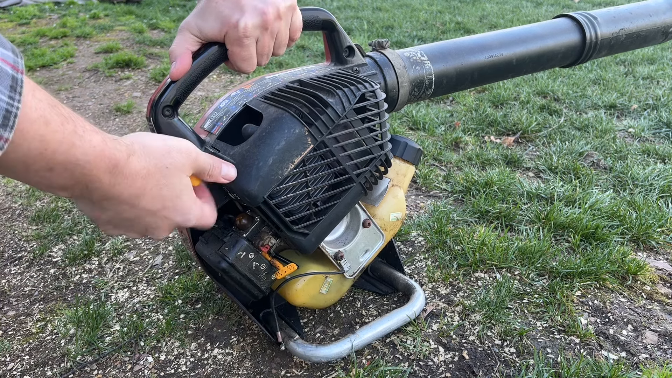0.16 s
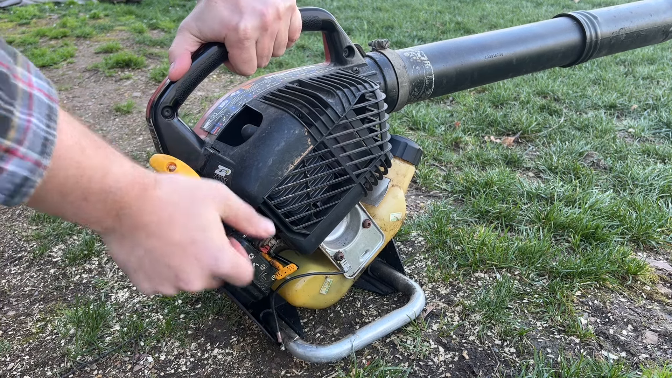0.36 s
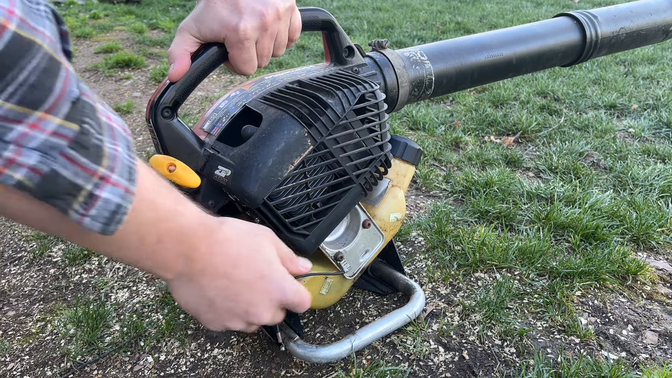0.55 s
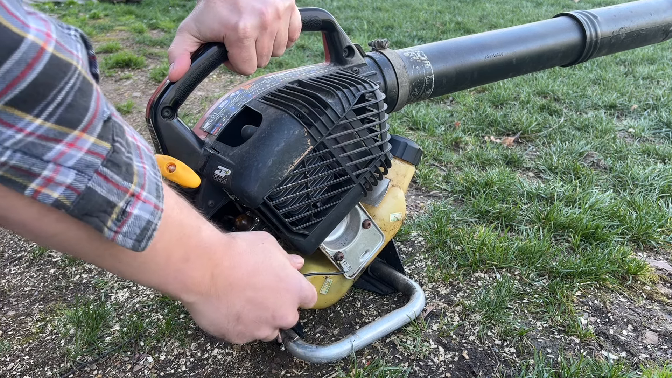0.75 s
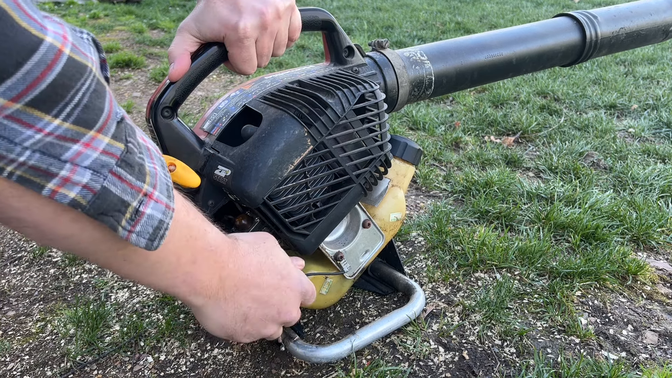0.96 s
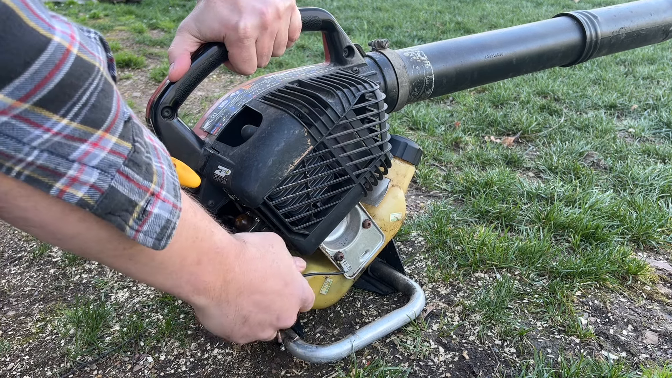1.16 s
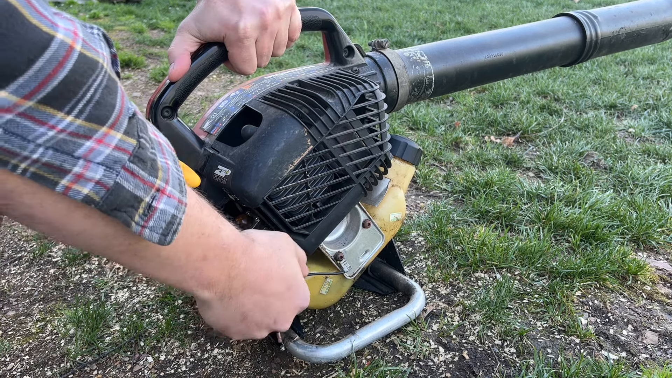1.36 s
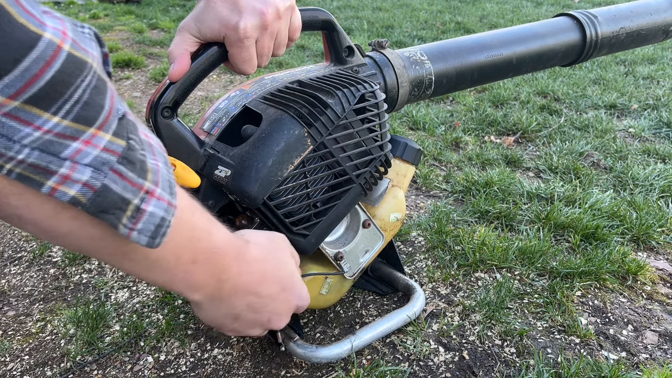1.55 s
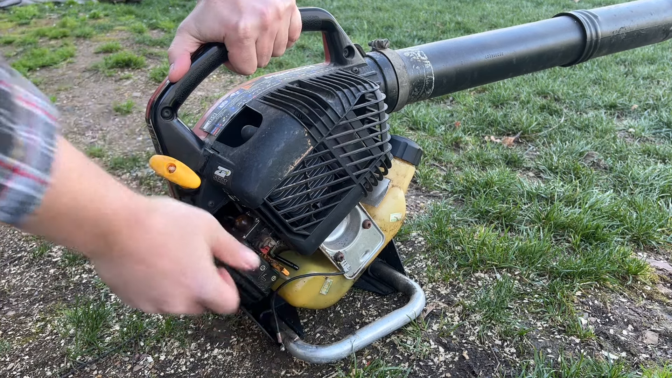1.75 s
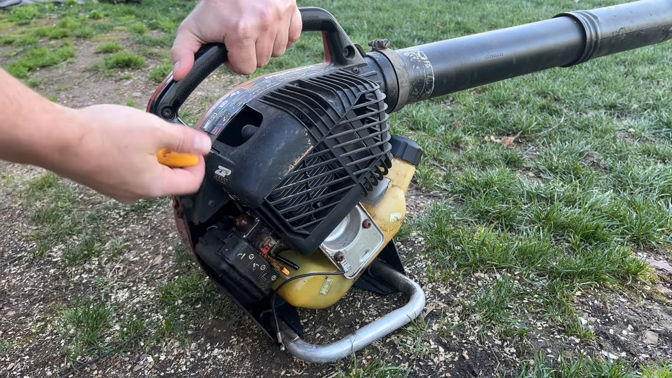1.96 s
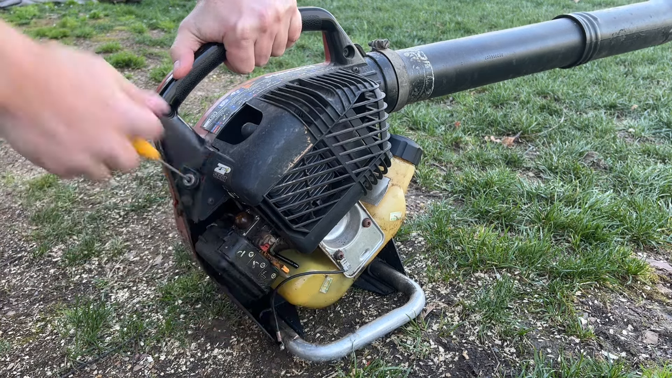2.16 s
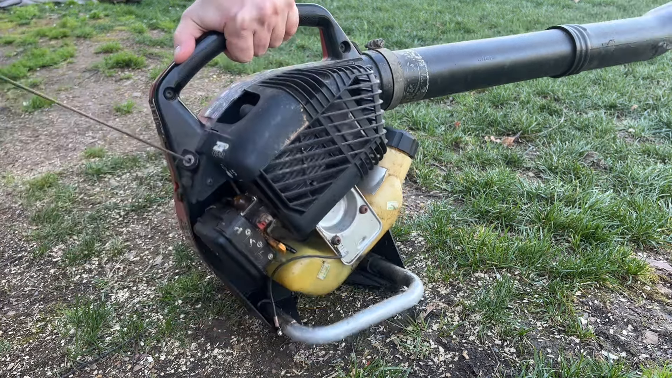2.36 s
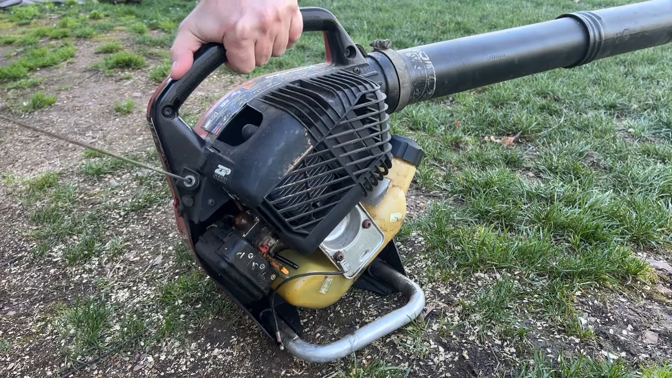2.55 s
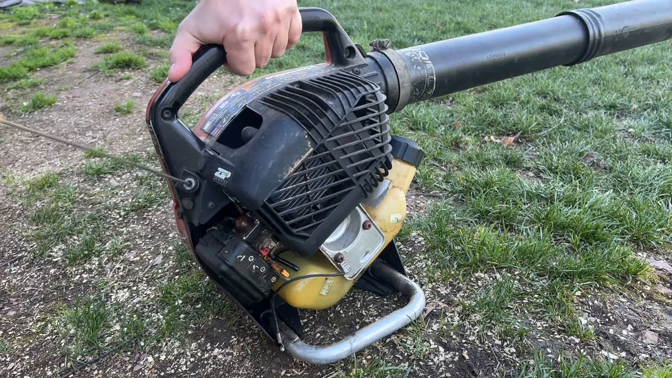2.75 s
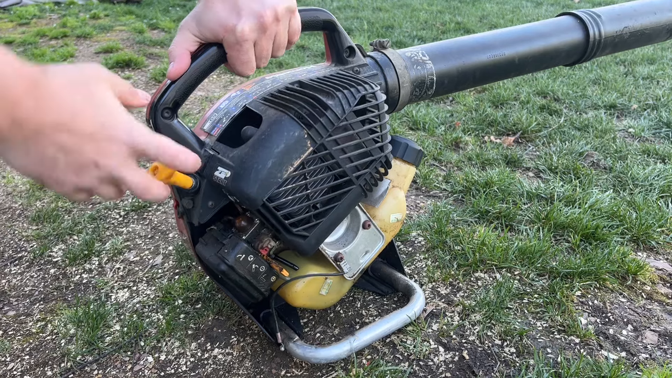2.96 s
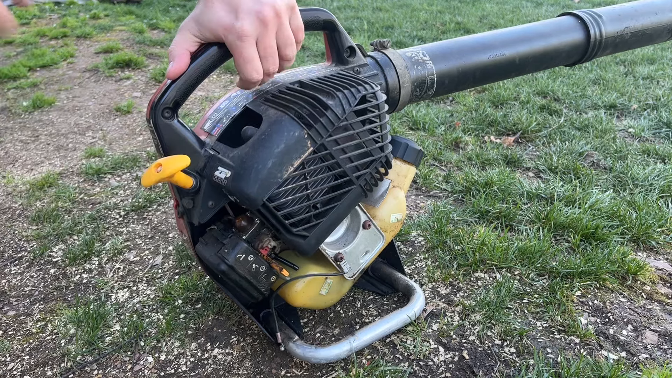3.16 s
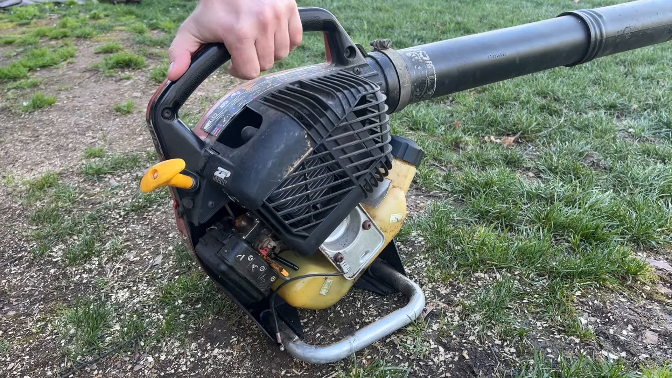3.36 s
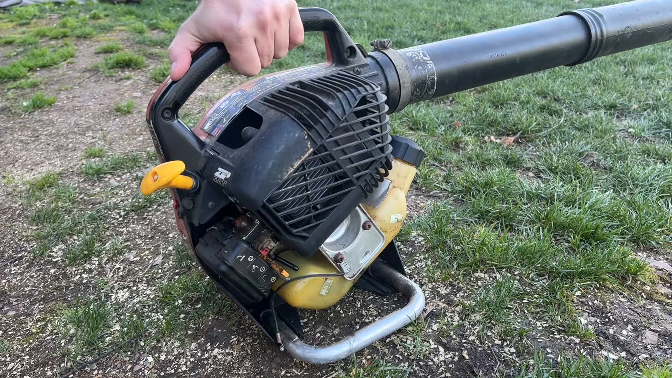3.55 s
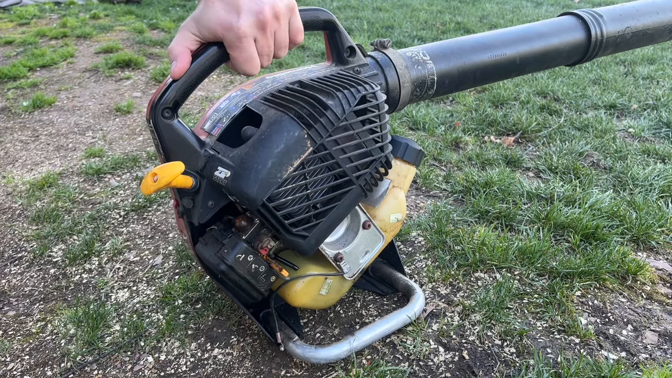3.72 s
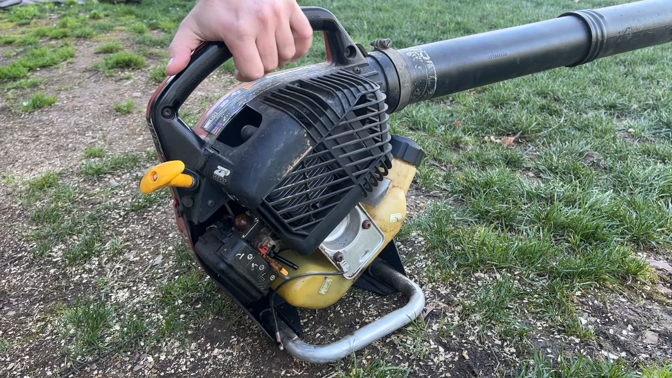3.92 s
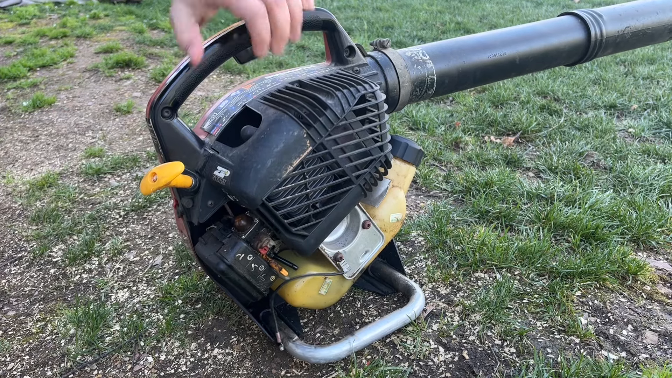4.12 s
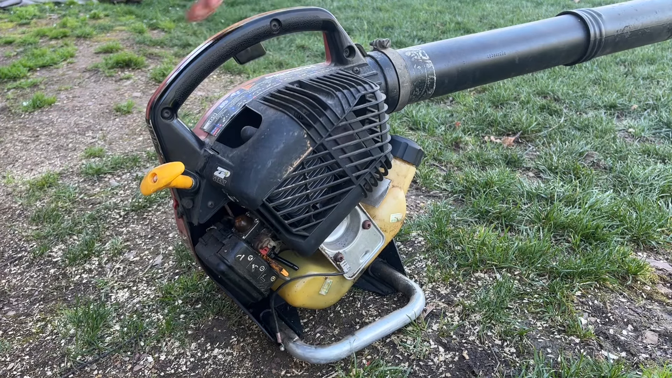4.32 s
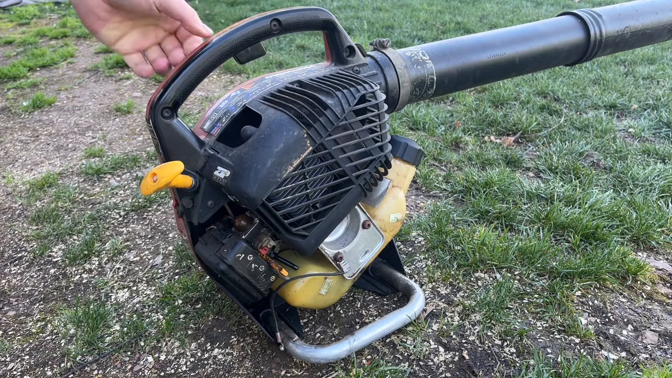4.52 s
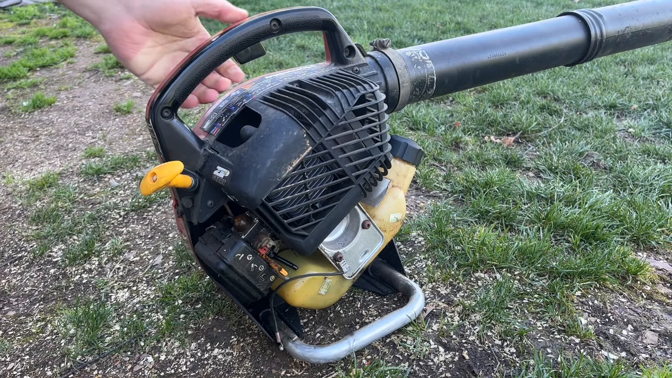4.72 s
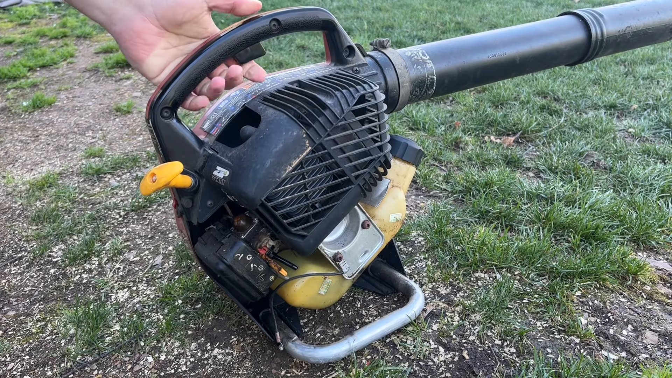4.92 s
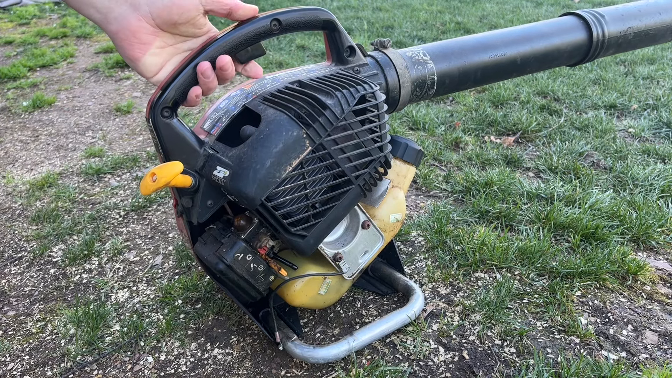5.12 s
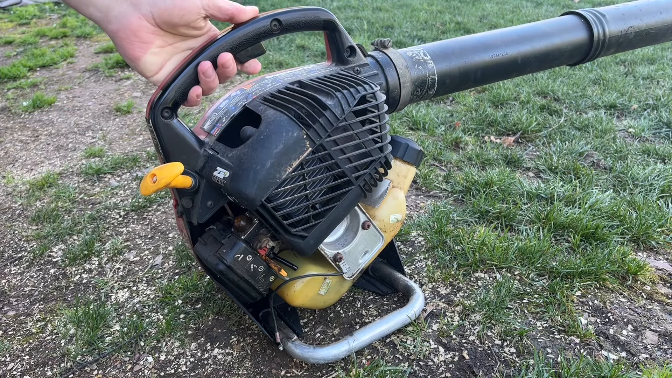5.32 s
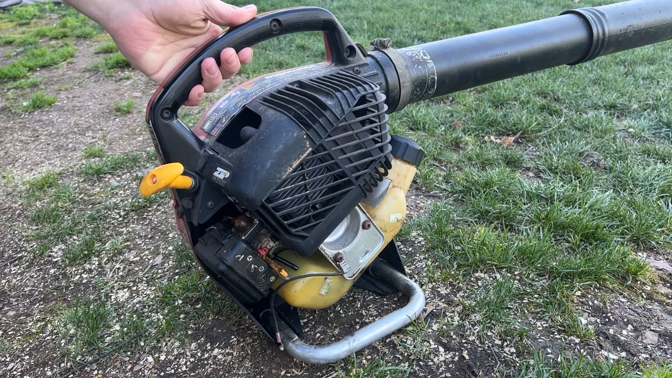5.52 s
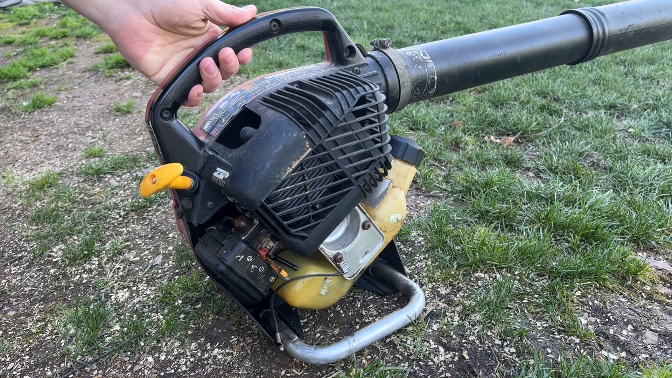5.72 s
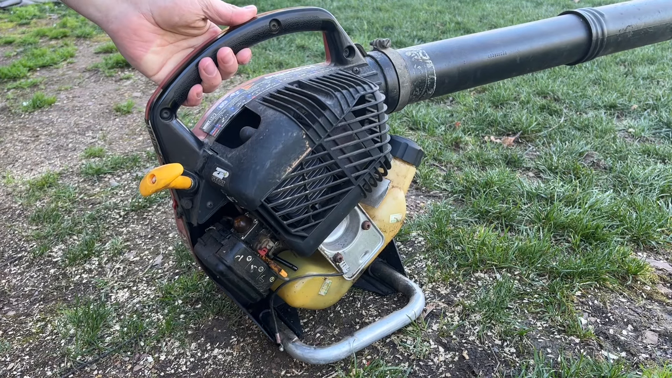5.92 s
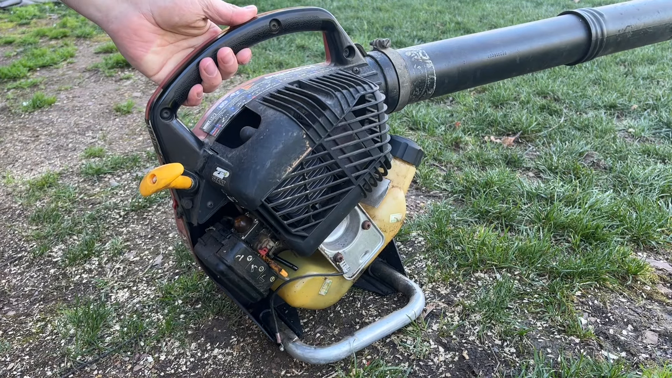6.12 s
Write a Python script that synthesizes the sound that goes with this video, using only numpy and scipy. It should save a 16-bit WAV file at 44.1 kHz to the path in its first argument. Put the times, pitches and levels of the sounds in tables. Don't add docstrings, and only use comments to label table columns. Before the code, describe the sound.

After two seconds of light wind and plastic ticks, a small two-stroke blower engine sputters awake, rattling, buzzing up, coasting down popping, revving again.

```python
import sys
import numpy as np
from scipy import signal
from scipy.fft import rfft, irfft, next_fast_len
from scipy.io import wavfile
from scipy.ndimage import map_coordinates

SR = 44100
rng = np.random.default_rng(int(sys.argv[2]) if len(sys.argv) > 2 else 0)


def master_out(mix):
    frames = np.transpose(np.atleast_2d(mix))
    ceiling = np.clip(frames, -1, 1)
    pcm = np.round(ceiling * 32767).astype(np.int16)
    wavfile.write(sys.argv[1], SR, pcm)


def boost(x):
    u = np.asarray(x, float) / 20
    return 10 ** u


N = 272538
TIME = np.arange(N) / SR
CORD_S, SPIN_UP_S = 2.124, 2.21


def unit(x):
    return x / np.sqrt(np.mean(x ** 2) + 1e-20)


def along(points, hz):
    f, v = np.transpose(points)
    return np.interp(np.log(hz + 1), np.log(f + 1), v)


def curves(rows):
    s, *cols = np.transpose(rows)
    return [np.interp(TIME, s, c) for c in cols]


def wobble(rate):
    knots = rng.standard_normal(int(N * rate / SR) + 4)
    return map_coordinates(knots, [np.arange(N) * rate / SR])


def ramp(s, length):
    return np.clip((TIME - s) / max(length, .001), 0, 1)


def filtered(x, response):
    m = next_fast_len(N + SR // 2)
    return irfft(rfft(x, m) * response(np.fft.rfftfreq(m, 1 / SR)), m)[..., :N]


def resonant(modes, order=1):
    def response(f):
        total = 0
        for k, (centre, width, db) in enumerate(modes):
            mode = 1j * f * width / (centre * centre - f * f + 1j * f * width)
            total = total + (-1) ** k * boost(db) * mode ** order
        return total
    return response


def noise(spectrum):
    return unit(filtered(rng.standard_normal(N), lambda hz: boost(along(spectrum, hz))))


def bursts(times, dbs, rise, t60):
    marks, t = np.zeros(N), np.arange(SR // 5) / SR
    marks[np.round(np.asarray(times) * SR).astype(int)] = boost(dbs)
    shape = (1 - np.exp(-t / rise)) * boost(-60 * t / t60)
    return np.abs(signal.fftconvolve(marks, shape)[:N])


def place(out, s, sound):
    out[round(s * SR):][:len(sound)] += sound


# t/s, level/dB
GUSTS = [(0.0, -58), (0.09, -53), (0.45, -58), (0.47, -49), (0.72, -57), (0.74, -51), (1.48, -55.5),
         (1.64, -41), (2.1, -49.5)]
# f/Hz, level/dB per Hz
RUMBLE = [(47, -26), (80, -0.5), (129, -7.5), (194, -11.5), (313, -24), (350, -33), (600, -42), (780, -80),
          (1320, -120)]
BUFFET = [(15, -30), (35, -3), (65, 10.5), (100, 3.5), (200, -55)]
RUSTLE = [(180, -30), (300, -2.5), (353, -9), (1230, -20.5), (1760, -26), (1970, -33), (5180, -40),
          (8600, -42), (12500, -42), (15000, -49)]
CLOTH = [(500, -30), (1400, 0), (1780, -2), (2400, -9), (3400, -7), (5500, -14.5), (9000, -17),
         (13000, -20), (15000, -40)]
# t/s, length/s, level/dB
SLEEVE = [
    (0.137, 0.2, -74),
    (0.563, .2, -68.5),
    (1.856, 0.19, -66.5),
]


def outdoors():
    gust_db = curves(GUSTS)[0] - np.mean(np.transpose(GUSTS)[1])
    rumble = boost(-47.5 + 0.13 * gust_db + 3.5 * wobble(4.6)) * noise(RUMBLE)
    buffet = boost(-48 + 1.08 * gust_db + 4.5 * wobble(15)) * noise(BUFFET)
    rustle = boost(-63.5 + 0.33 * wobble(31.1)) * noise(RUSTLE)
    arm = sum(boost(db) * np.exp(-((TIME - s) / length) ** 2) for s, length, db in SLEEVE)
    return rumble + buffet + rustle + arm * boost(2.9 * wobble(39.4)) * noise(CLOTH)


# t/s, peak level/dB, knock level/dB, t60/s
TICKS = [
    (0.0475, -58.5, 30, 0.043),
    (0.197, -58, -8, 0.22),
    (0.3016, -67, 35, 0.033),
    (1.3987, -59.5, 25, 0.04),
    (1.4616, -35, 1, 0.047),
    (1.8826, -56, 18, 0.047),
]
# f/Hz, width/Hz, level/dB
SHELL = [(454, 38, 9), (920, 51, -1.5), (1310, 100, -6), (1750, 270, -18)]
# f/Hz, level/dB, t60/s
LATCH = [(834, -3, 0.23), (1210, 23.5, 0.017), (2700, -12, 0.09), (3020, -2, 0.15), (3700, -4, 0.09),
         (5200, -11, 0.11), (6400, -9, .09), (10100, 25.5, 0.014)]


def ticks():
    out, blows, t = np.zeros(N + SR), np.zeros(N), np.arange(SR // 4) / SR
    for s, db, knock_db, t60 in TICKS:
        place(out, s, boost(db - 60 * t / max(t60, .005)) * rng.standard_normal(len(t)))
        blows[round(s * SR)] = boost(db + knock_db + 25)
    lever_s, lever_db = TICKS[4][:2]
    for hz, level, t60 in LATCH:
        place(out, lever_s, boost(lever_db + level - 18 - 60 * t / min(t60, .3)) * np.sin(2 * np.pi * hz * t))
    return out[:N] + filtered(blows, resonant(SHELL))


# t/s, peak level/dB, mid band over the top/dB
RATTLES = [(2.187, -36, 14), (2.2181, -26.5, 17), (2.382, -25, 3), (2.397, -13.5, 1.5), (2.411, -22, 2),
           (2.4933, -16, 7.5), (2.5292, -21, 9), (2.5536, -20, 5), (2.591, -15, -1), (2.6248, -21, 11),
           (2.6473, -21, 12.5), (2.6802, -18, 4), (2.7102, -20.5, -1), (2.7297, -36, 5), (2.7508, -13, 2),
           (2.8754, -17.5, 8), (2.915, -15, 3), (2.959, -19.5, 2), (2.9936, -17.5, 5.5), (3.0332, -19, 7),
           (3.3084, -19.5, -4), (3.44, -14.5, -12), (3.5538, -12, -1), (3.5892, -20, -9),
           (4.799, -24.5, -2), (4.9335, -26, -1), (5.0788, -26.5, -12), (5.236, -27.5, -1),
           (5.488, -26, -1), (5.5812, -26, 3)]
# f/Hz, level/dB per Hz
LOOSE = [(600, -22), (1500, -6), (2100, -3.5), (3500, -2.5), (5000, -24.5)]
AIR = [(2500, -32), (4500, -2), (6000, 1), (8000, -0.5), (11000, -4), (13500, -7), (14500, -15),
       (15700, -22)]


def rattles():
    kicks = []
    for s, db, *_ in POPS:
        if s > 4 and min(abs(s - r[0]) for r in RATTLES) > .01:
            kicks.append((s, db - 15.5, 9))
    s, db, mid_db = np.transpose(list(RATTLES) + kicks)
    grit = boost(4.6 * wobble(700))
    bright = bursts(s, db - 4, rise=0.00056, t60=0.052) * noise(AIR)
    mid = bursts(s, db + mid_db + 4, rise=0.0026, t60=0.017) * noise(LOOSE)
    return grit * (bright + mid)


# t/s, peak level/dB, ring f/Hz
CLACKS = [(2.2225, -18, 1330), (2.2738, -11, 1600), (2.3164, -13.5, 1300), (3.3075, -13, 1350),
          (3.5172, -14, 1520), (3.5542, -7, 1260), (3.5907, -11, 1140), (3.7944, -10, 1342)]


def clacks():
    out, t = np.zeros(N + SR), np.arange(SR // 20) / SR
    for s, db, hz in CLACKS:
        ring = np.sin(2 * np.pi * hz * t) + 0.64 * np.sin(2 * np.pi * 1.55 * hz * t)
        place(out, s, boost(db + 3 - 60 * t / 0.023) * (1 - np.exp(-t / 0.00063)) * ring)
    return out[:N]


# t/s, peak level/dB, ring f/Hz, crack level/dB
POPS = [(2.146, -27.5, 435, 3), (2.166, -21, 302, -16), (2.189, -7, 440, 5.5), (3.309, -4.5, 456, 5),
        (4.117, -19.5, 276.5, -9), (4.166, -19, 370, -12), (4.296, -14.5, 442, -9), (4.56, -20, 294.1, -6),
        (4.656, -22, 263.3, -6), (4.727, -22.5, 243, -13), (4.803, -17, 245, -14), (4.935, -15.5, 273, -19),
        (5.079, -15, 257, -12), (5.238, -14, 265.4, 2), (5.395, -17.5, 264.9, -4), (5.459, -30, 423, -4),
        (6.014, -5.5, 450.1, -16), (6.042, -10, 482.4, -8)]


def pops():
    out, t = np.zeros(N + SR), np.arange(SR // 10) / SR
    for s, db, hz, _ in POPS:
        push = boost(-5 - 14 * np.log2(hz / 270)) * np.sin(2 * np.pi * 145 * t)
        ring = np.sin(2 * np.pi * hz * t) + push
        place(out, s, boost(db + 1.5 - 60 * t / 0.059) * (1 - np.exp(-t / 0.0011)) * ring)
    s, db, _, crack_db = np.transpose(POPS)
    return out[:N] + bursts(s, db + crack_db - 7, rise=0.00056, t60=0.0087) * noise(LOOSE)


# opens t/s, shuts t/s, last fuel burns t/s
TRIGGER = [
    (2.167, 3.045, 3.06),
    (3.413, 3.9, 4.055),
    (5.456, 6.3, 6.4),
]


def throttle():
    open_s, shut_s = 0.0091, 0.022
    opened = sum(ramp(a, open_s) - ramp(b, shut_s) for a, b, _ in TRIGGER)
    burning = sum(ramp(a, open_s) - ramp(c, shut_s) for a, _, c in TRIGGER)
    return opened, np.maximum(opened, burning)


def layer_db(row, speed, opened, burning):
    on, off, coast, up, down = row
    octaves = np.log2(speed / 78.5)
    level = opened * (on + up * octaves) + (burning - opened) * off
    return level + (1 - burning) * (coast + down * octaves)


ORDER_DB = [(-32, -50, -39, 2, 4), (-19.5, -38, -46, -2, 6), (-37, -38, -45, 6, 8), (-35, -16, -45, 19, 8)]
COLD_ORDER_DB = [-6, 1, 19, 33]


def drone(turns, load_db, labour, level):
    total = 0
    for k, row in enumerate(ORDER_DB):
        order_db = level(row) + COLD_ORDER_DB[k] * labour + load_db + 1.5 * wobble(12)
        total = total + boost(order_db) * np.sin(2 * np.pi * (k + 1) * turns + .3 + k)
    return total


def port(turns, edges, uneven_db, rough, chamber):
    pulses = np.zeros(N)
    for angle, size in edges:
        whole = np.floor(turns - angle)
        at = np.flatnonzero(np.diff(whole) > 0)
        size_db, early = rng.standard_normal((len(at), 2)).T
        jittered = np.clip(at + np.round(.00022 * SR * early).astype(int), 0, N - 1)
        pulses[jittered] += size * boost(1.4 * size_db + uneven_db[at] * (-1) ** whole[at])
    flow = rng.standard_normal(N) * np.exp(0.6 * np.cos(2 * np.pi * (turns - angle)))
    steps = np.sqrt(1 - rough) * unit(filtered(pulses, chamber))
    return steps + np.sqrt(rough) * unit(filtered(flow, chamber))


# f/Hz, width/Hz, level/dB; then their layer rows
INTAKE = [(127, 173, -6.5), (401, 268, 0.5), (718, 57, -22), (1054, 166, -4.5), (1280, 68, -56)]
EXHAUST = [(138, 103, -1.5), (279, 26.6, 5), (452.7, 19.3, 0.5), (762, 14, -35)]
INTAKE_DB = (-17.5, -26.5, -39.5, -1.5, 18)
EXHAUST_DB = (-23, -25, -33, -1.5, 7)


def breath(turns, speed, opened, burning, cold, labour, level):
    uneven_db = np.clip(8 * np.log2(speed / 75), 0, None) * opened
    rough = .1 * burning + .2 * (1 - burning) + .55 * cold
    intake = port(turns, [(0, -0.31), (.36, -1.28)], uneven_db / 5, rough, resonant(INTAKE, order=2))
    exhaust = port(turns, [(.7, -1)], uneven_db, rough, resonant(EXHAUST))
    return boost(level(INTAKE_DB)) * intake + boost(level(EXHAUST_DB) + 6 * labour) * exhaust


# f/Hz, width/Hz, level/dB
CASING = [(1350, 165, -0.5), (1957, 71, -2), (2400, 230, -34), (2505, 54, -1), (3094, 700, -8.5),
          (3661, 116, 5.5), (3993, 76, -7), (4684, 68, -12), (5790, 150, -18), (6330, 190, -9.5)]
# f/Hz, level/dB per Hz
BODY = [(150, -28), (400, -9.5), (800, -17), (1500, -12), (2300, -13), (2750, -21), (3300, -17),
        (4500, -18.5), (7000, -40), (12000, -59)]
CLATTER_DB = (-26, -23.5, -27.5, 5, 3)
HISS_DB = (-35.5, -32.5, -38.5, 8, 10)
RING_DB = (1.5, -3, 4, -3, -0.5)


def gear(turns, shake_db, cold, level):
    surface = rng.standard_normal((256, 128))
    scrape = map_coordinates(surface, [turns / 5, 128 * turns], order=1, mode="grid-wrap")
    shake = .45 * unit(scrape) + .9 * rng.standard_normal(N)
    beat = boost(0.94 * np.cos(2 * np.pi * turns) + 0.5 * np.cos(4 * np.pi * turns) + 1.2 * wobble(90))
    ring = unit(filtered(beat * shake, resonant(CASING, order=2)))
    body = unit(filtered(beat * shake, lambda hz: boost(along(BODY, hz))))
    clatter = boost(level(RING_DB) - 6.5 - 5.6 * cold) * ring + boost(-1.5) * body
    hiss = unit(boost(1.9 * np.cos(2 * np.pi * turns) + 1.9 * wobble(70)) * noise(AIR))
    clatter = boost(level(CLATTER_DB) + shake_db + 0.83 * wobble(9)) * clatter
    return clatter + boost(level(HISS_DB) + shake_db + 0.7 * wobble(14)) * hiss


# t/s, speed/turns per s, load level/dB, housing shake level/dB
SHAFT = [(2.2, 26, -7.5, 11), (2.38, 34.5, -1, 10.5), (2.58, 39.2, 1.5, 10), (2.75, 52.4, 3, 5),
         (2.9, 70.4, 2, 2), (3.05, 89, 0.5, 3.5), (3.12, 94.7, 3, 2.5), (3.41, 64.5, 2, 3.5),
         (3.68, 102.3, 1, 2.5), (3.9, 123, -1.5, 1.2), (4.08, 100.5, 0.5, 0), (4.36, 76.8, 1.5, -2),
         (4.64, 60, 0, -2), (5.0, 47.9, 4.5, -3), (5.45, 40.4, -6.5, -0.7), (5.6, 59.5, -3, -1.5),
         (5.81, 103.5, -1, 0.5), (6.18, 129, -1.5, 1.9)]


def engine():
    speed, load_db, shake_db = curves(SHAFT)
    turns = np.cumsum(speed * (1 + .003 * wobble(25))) / SR
    opened, burning = throttle()
    level = lambda row: layer_db(row, speed, opened, burning)
    after = np.clip(TIME - SPIN_UP_S, 0, None)
    cold = np.exp(-after / .24)
    labour = after / .17 * np.exp(1 - after / .17)
    quiet = 1 - 0.41 * ramp(CORD_S, SPIN_UP_S - CORD_S) - 0.61 * ramp(SPIN_UP_S, 0.005)
    turning = ramp(CORD_S - .03, 0.13) * boost(-19 * quiet)
    low = ramp(2.24, 0.023) * drone(turns, load_db, labour, level)
    air = boost(load_db) * breath(turns, speed, opened, burning, cold, labour, level)
    return low + (air + gear(turns, shake_db, cold, level)) * turning


# f/Hz, likeness/0-1
ALIKE = [(300, .997), (800, .9), (1600, .88), (2000, .9), (3500, .85), (5000, .65), (6200, .8),
         (7500, .985), (9000, .985), (10500, .85), (15000, .9)]
# f/Hz, level/dB
LEAN = [(60, -2.5), (350, -2.7), (600, -1), (950, 2), (1450, -3), (1700, 0), (4000, 0), (4600, 2.5),
        (6300, 2), (7500, 0)]
# f/Hz, phase/rad
LEAD = [(60, 0), (780, .7), (1800, 0), (3270, 1), (5000, .5), (6000, -.9), (7600, -2.6), (8400, -3.14),
        (9500, -4.2), (12050, -6.28), (13350, -7.5), (15100, -9.4)]


def scene():
    near = outdoors() + ticks() + rattles() + clacks() + pops() + engine()
    t = np.arange(SR // 10) / SR
    tails = rng.standard_normal((2, len(t))) * boost(-60 * t / .065)
    tails = tails / np.linalg.norm(tails[0])
    paths = signal.fftconvolve(near[None], tails, axes=1)[:, :N]
    sway = 1.6 * wobble(6)
    scatter = np.cos(sway) * paths[0] + np.sin(sway) * paths[1]
    side = np.array([[1], [-1]])
    turn = lambda hz: np.arccos(np.clip(along(ALIKE, hz), 0, 1)) / 2
    ports = lambda hz: boost(side * along(LEAN, hz) / 2) * np.exp(.5j * side * along(LEAD, hz))
    direct = filtered(near, lambda hz: ports(hz) * np.cos(turn(hz)))
    return direct + filtered(scatter, lambda hz: side * ports(hz) * np.sin(turn(hz)))


def band_limit(x):
    return signal.sosfilt(signal.butter(12, 15750, fs=SR, output="sos"), x)


def record(dry):
    heard = filtered(dry, lambda hz: (1j * hz / (1j * hz + 45)) ** 2)
    soft = heard / (1 + np.abs(heard / 1.05) ** 6) ** (1 / 6)
    mix = filtered(soft, lambda hz: hz < 15750)
    return band_limit(mix)


dry = scene()
out = record(dry)
master_out(out)
```